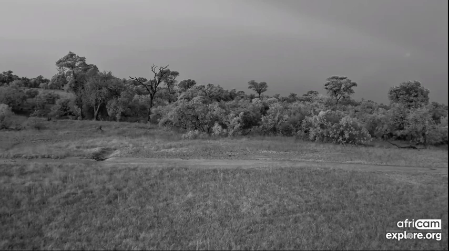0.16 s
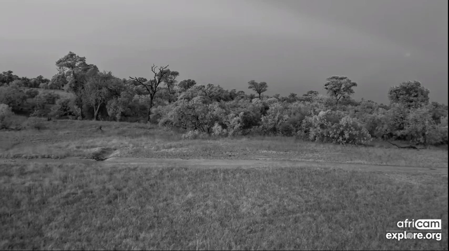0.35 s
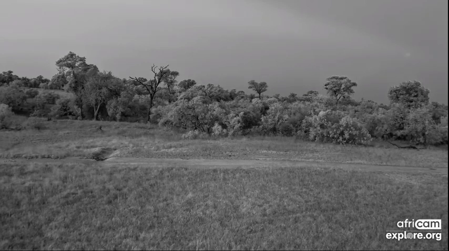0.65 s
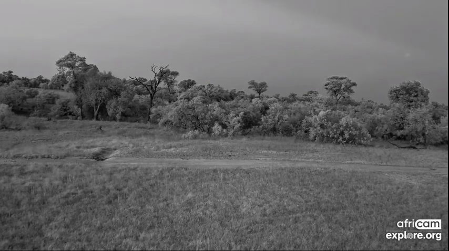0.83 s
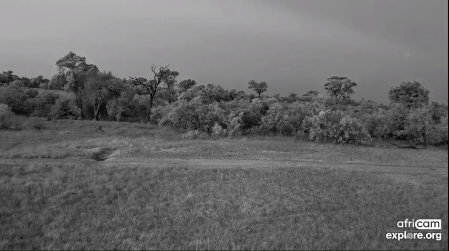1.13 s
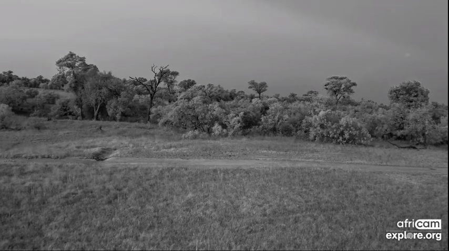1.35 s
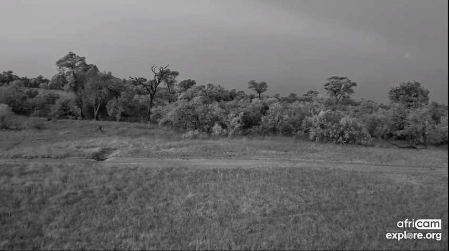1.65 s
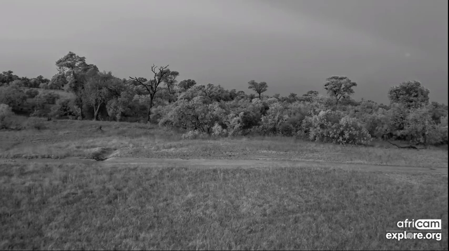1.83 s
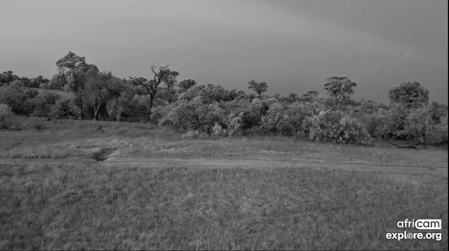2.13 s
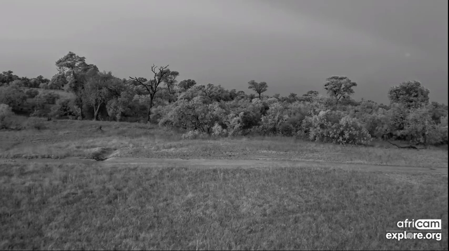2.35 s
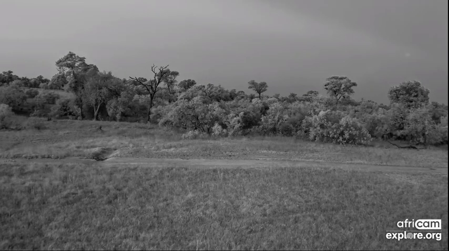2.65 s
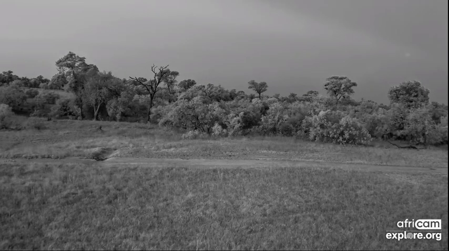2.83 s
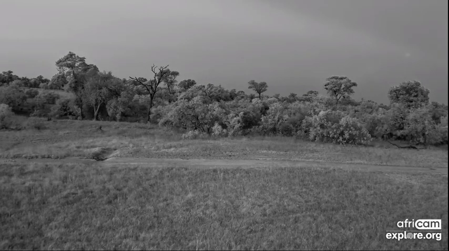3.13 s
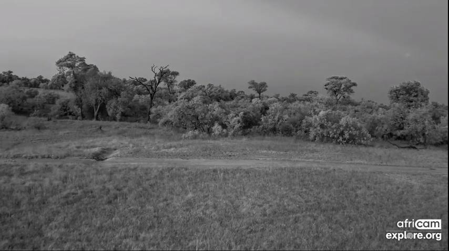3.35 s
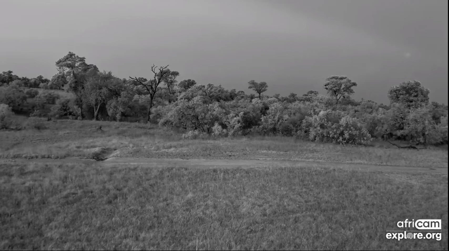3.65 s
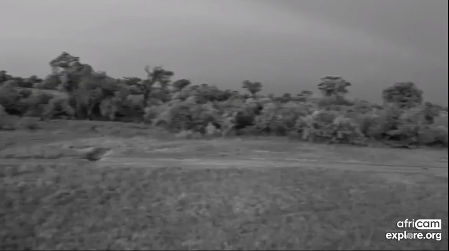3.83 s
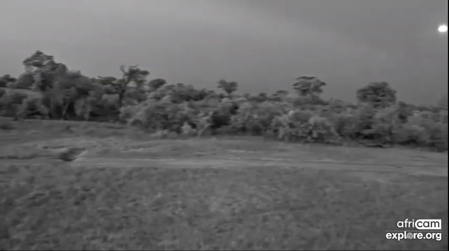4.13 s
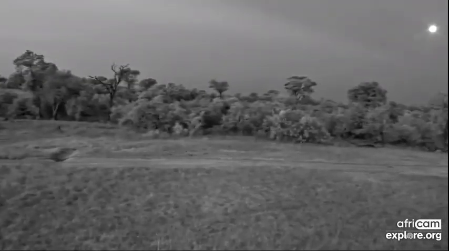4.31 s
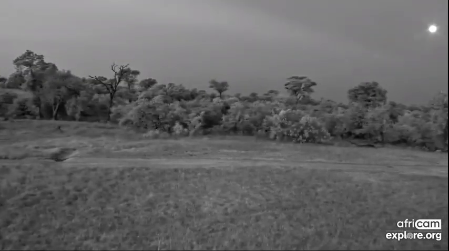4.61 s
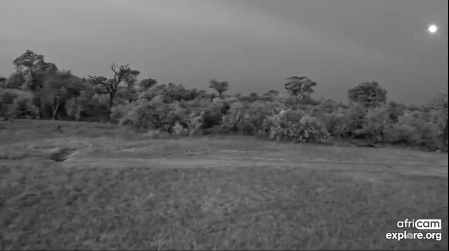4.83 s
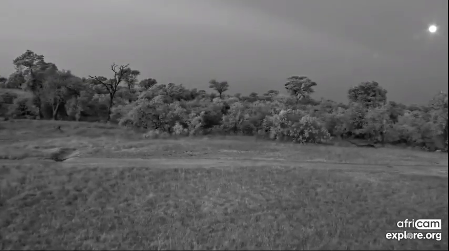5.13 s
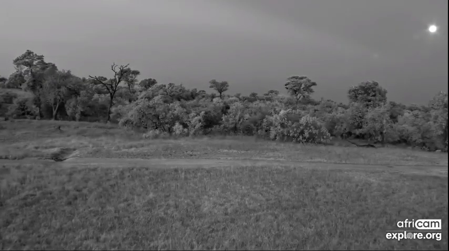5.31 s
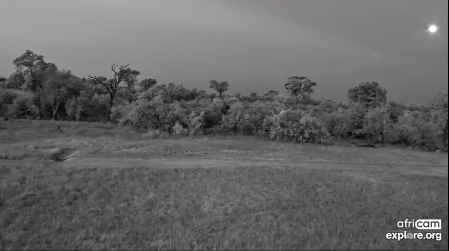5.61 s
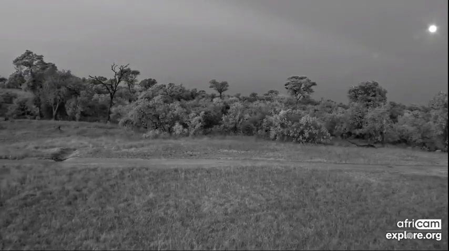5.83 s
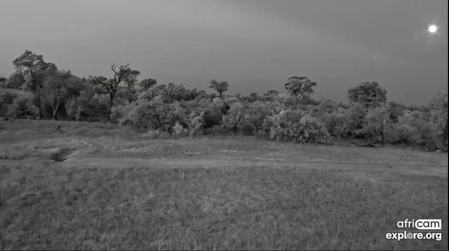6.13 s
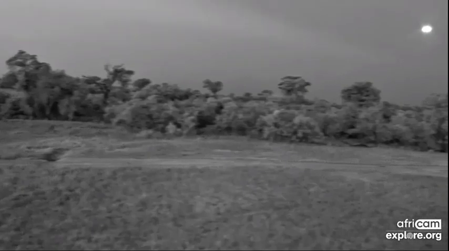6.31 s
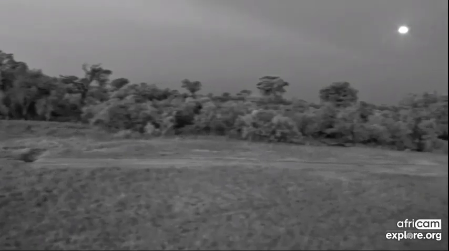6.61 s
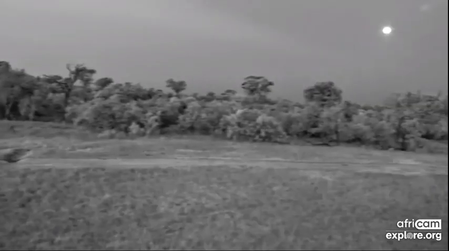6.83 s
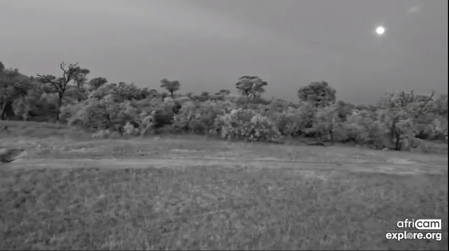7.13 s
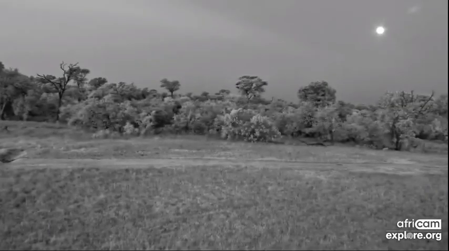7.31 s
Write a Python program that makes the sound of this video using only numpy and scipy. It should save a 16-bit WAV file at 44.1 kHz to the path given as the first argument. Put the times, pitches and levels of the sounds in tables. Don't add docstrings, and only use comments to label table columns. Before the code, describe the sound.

A faint twig snap, then five harsh guttural rasps dominate the first three seconds, close and dry with only a slight echo from trees. Brief cricket trills follow, then quieter clusters of squeaky, scratchy bird notes and quick warbles, ending in faint distant peeps. Constant high insect buzzing, airy hiss and a low wind rumble that fades fill the open night field.

```python
import sys
import numpy as np
from scipy import signal
from scipy.io import wavfile
from scipy.ndimage import uniform_filter1d, minimum_filter1d

SR = 44100
rng = np.random.default_rng(int(sys.argv[2]) if len(sys.argv) > 2 else 0)


def boost_factor(decibels):
    exponent = np.asarray(decibels, float) / 20
    return 10 ** exponent


def dump_mix(stems):
    frames = np.atleast_2d(stems).T
    limited = np.clip(frames, -1, 1)
    pcm = np.round(limited * 32767).astype(np.int16)
    wavfile.write(sys.argv[1], SR, pcm)


N = 328986

# (frequency [Hz], density [dB per Hz])
HISS_COLOUR = [(12, -32), (20, 3.5), (32, -1), (60, -2), (158, -3.5), (225, -7.5), (354, -2), (489, 2),
               (1100, -2.5), (1430, -1), (2390, -5.5), (3570, 1), (4310, -4), (6630, -5), (7380, -5),
               (12300, -10), (16000, -59), (22000, -120)]
# (time [s], level [dB])
WIND_LEVEL = [(0, -53.5), (.68, -45), (2.29, -46), (2.51, -54.5), (4.5, -61.5), (6.6, -56.5), (7.46, -67)]
# (time [s], count [strokes])
STROKE_COUNT = [(0, -.2), (1, 37.88), (2, 75.95), (3, 113.86), (4, 151.85), (4.6, 174.78), (5.4, 205.3),
                (6.4, 243.7), (7.46, 284)]
# (time [s], level [dB])
CHIRR_LEVEL = [(0, -58), (.22, -58), (.3, -55), (.81, -47), (.95, -49.5), (1.7, -45), (1.89, -40.5),
               (2.2, -44), (2.39, -51.5), (2.88, -43.5), (3.03, -47.5), (3.22, -44), (3.61, -55.5),
               (5.45, -57.5), (5.74, -52.5), (6.3, -53), (6.63, -48.5), (7.46, -54)]
# (frequency [Hz], width [Hz], level [dB])
WING_MODES = [(6830, 220, -15), (7265, 120, 0), (7590, 115, 1.5), (8105, 130, 0), (8445, 130, -2),
              (8950, 250, -10), (9300, 200, -11)]
# (time [s], tilt [dB per upper overtone], lowest overtones [dB])
FACING_TILT = [(0, -0.5, 4), (1.7, -5.5, 2.5), (2.25, 0.5, 2), (2.9, -2.5, 1), (3.3, -1, 3), (3.45, -3, 5),
               (3.75, 1, 7), (3.9, -0.5, 4.5), (5.5, -1.5, 3.5), (6.7, -1.5, -0.5), (7.46, 3.5, 4)]
# (time [s], effort [dB], upper throat [dB])
RASP_EFFORT = [
    [(0.49, -52, -47), (0.504, -39.5, -45.5), (0.594, -24.5, -33.5), (0.712, -23.5, -26.5),
     (0.742, -19.5, -23), (0.764, -23, -27), (0.828, -22.5, -27.5), (0.878, -39, -42.5), (0.91, -62, -55)],
    [(1.1, -77, -59), (1.112, -29, -41), (1.128, -23, -32.5), (1.16, -25, -32.5), (1.174, -22, -24),
     (1.182, -19, -31), (1.236, -18.5, -27), (1.31, -25, -30), (1.322, -30, -39), (1.36, -44, -53)],
    [(1.6, -65, -52), (1.612, -35, -33.5), (1.63, -15.5, -26.5), (1.636, -24, -31), (1.722, -19, -21.5),
     (1.772, -20, -27.5), (1.812, -25, -36), (1.823, -40, -38), (1.84, -61, -45)],
    [(2.05, -48, -51), (2.056, -49, -34), (2.064, -23.5, -29), (2.17, -18, -25), (2.22, -19.5, -27),
     (2.26, -33, -36), (2.27, -37, -47), (2.285, -53, -50)],
    [(2.5, -65, -69), (2.512, -25, -35), (2.542, -19.5, -28), (2.59, -24, -27.5), (2.596, -20.5, -22.5),
     (2.676, -19.5, -26.5), (2.696, -24, -30), (2.706, -27, -38), (2.74, -56, -45)],
]
# (frequency [Hz], width [Hz], level [dB])
THROAT_MODES = [(740, 220, -13.5), (1060, 160, 5.5), (1294, 123, 3), (1445, 170, -9.5), (1884, 440, -9.5),
                (2585, 570, -7.5), (3120, 280, 0), (3360, 170, 4.5), (3600, 540, -3.5), (4440, 520, 2.5),
                (5600, 1460, 2)]
TOP_OPENING = [-4, -0.5, 5.5, 2, 3.5]
# (frequency [Hz], width [Hz])
RASP_NOTCHES = [(2260, 150), (2765, 260)]
# (time [s], peak [dB])
FOLD_SLAPS = [(0.532, -27), (0.576, -19), (0.588, -27), (0.618, -23), (0.667, -16.5), (0.713, -14),
              (0.738, -12), (0.776, -14), (0.804, -13), (0.826, -12), (1.113, -20), (1.123, -17.5),
              (1.161, -19), (1.191, -13), (1.219, -19), (1.249, -20), (1.268, -8.5), (1.299, -11),
              (1.613, -16), (1.626, -15), (1.652, -8), (1.691, -9), (1.719, -11), (1.771, -10),
              (1.788, -13), (2.064, -13), (2.075, -10.5), (2.088, -18), (2.112, -14), (2.135, -19),
              (2.169, -17), (2.199, -20), (2.219, -28), (2.513, -26), (2.524, -16), (2.543, -11),
              (2.597, -12), (2.613, -16), (2.649, -17), (2.678, -25)]
# (time [s], peak [dB])
THROAT_FLARES = [(0.5412, -25), (0.5641, -18), (0.5921, -22), (0.622, -15), (0.6554, -17), (0.6905, -12.5),
                 (0.732, -12.5), (0.7594, -22), (0.7894, -30), (0.8155, -20), (1.1223, -25), (1.163, -22),
                 (1.2057, -18), (1.2271, -21), (1.2585, -25), (1.2894, -21), (1.6222, -19), (1.6424, -16),
                 (1.6675, -10), (1.7162, -7.5), (1.756, -11.5), (1.8114, -32), (2.0672, -21), (2.082, -14),
                 (2.1094, -24), (2.1294, -14), (2.1587, -14), (2.1894, -17), (2.2194, -14), (2.5117, -32),
                 (2.5252, -22), (2.5474, -31), (2.5631, -14), (2.595, -16), (2.6294, -13), (2.6678, -17),
                 (2.6888, -19)]
# (time [s], length [s], start [Hz], end [Hz], level [dB])
WHEEZE_NOTES = [(0.962, 0.045, 1480, 1550, -47.5), (1.522, 0.048, 2330, 1750, -50),
                (1.543, 0.14, 1673, 1820, -46), (2.021, 0.039, 1530, 1440, -42),
                (4.15, 0.011, 5460, 5450, -40), (4.168, 0.014, 5530, 5600, -35.5),
                (4.179, 0.018, 5500, 3130, -43), (4.217, 0.011, 5100, 5440, -45),
                (6.103, 0.039, 2000, 1660, -48), (5.168, 0.04, 5300, 5280, -52),
                (4.296, 0.046, 5480, 5430, -46), (4.454, 0.079, 5310, 5170, -46.5),
                (4.529, 0.014, 5170, 5150, -44), (4.54, 0.026, 5170, 5120, -43.5),
                (4.56, 0.024, 5080, 5180, -43), (4.57, 0.03, 5150, 3600, -47),
                (4.547, 0.05, 3250, 3320, -44), (4.629, 0.08, 5310, 5300, -45.5),
                (5.128, 0.02, 4220, 4100, -48), (5.196, 0.028, 4950, 5000, -51),
                (5.22, 0.095, 5020, 4840, -49.5), (5.296, 0.027, 4720, 3600, -48),
                (5.33, 0.026, 3800, 5000, -49), (5.342, 0.1, 4920, 5080, -47),
                (5.728, 0.037, 6300, 6080, -41.5), (5.755, 0.021, 5770, 5700, -38),
                (5.772, 0.021, 5600, 5100, -42), (5.821, 0.1, 5670, 5680, -48),
                (5.902, 0.054, 3310, 4230, -35.5), (5.955, 0.071, 4850, 4580, -42)]
# (time [s], length [s], start [Hz], end [Hz], level [dB])
WHISTLE_NOTES = [(1.186, 0.017, 4640, 4950, -31.5), (1.197, 0.05, 4876, 4940, -31.5),
                 (1.24, .008, 5050, 5370, -34), (1.247, 0.014, 5600, 6240, -29.5),
                 (1.677, 0.047, 2600, 2760, -30), (2.711, 0.024, 2780, 2790, -39),
                 (5.135, 0.026, 1745, 1650, -51.5), (5.727, 0.038, 4560, 4630, -39.5),
                 (4.273, 0.032, 2970, 2720, -33.5), (4.293, 0.046, 2740, 2654, -33.5),
                 (4.335, 0.029, 2658, 2640, -41)]
# (time [s], length [s], start [Hz], end [Hz], level [dB])
SCOLD_NOTES = [(2.727, 0.1, 3500, 3320, -43), (2.774, 0.09, 3600, 3410, -48),
               (2.732, 0.091, 4450, 4200, -54), (4.191, 0.12, 5510, 5800, -46.5),
               (4.192, 0.068, 3300, 3270, -39), (4.251, 0.12, 3600, 3440, -46),
               (5.949, 0.092, 4950, 4270, -46), (5.333, 0.113, 3400, 3460, -50.5),
               (5.735, 0.084, 5580, 4830, -44), (5.783, 0.12, 3310, 3350, -40),
               (5.791, 0.15, 5430, 5500, -47), (5.91, 0.12, 3820, 4340, -43),
               (6.028, 0.14, 4100, 3870, -43.5)]
# (time [s], length [s], start [Hz], end [Hz], level [dB])
PEEP_NOTES = [(4.157, .04, 2140, 2090, -53), (3.015, .05, 1840, 1770, -60), (6.415, .04, 2050, 2200, -54),
              (6.425, .03, 4080, 4150, -58), (6.445, .02, 3550, 3650, -55), (6.56, .02, 1800, 2200, -54),
              (6.71, .025, 4130, 4110, -54), (6.74, .014, 2100, 1600, -57), (6.845, .025, 1910, 1960, -53),
              (6.835, .02, 3400, 3500, -55), (6.885, .025, 3500, 3400, -54), (6.99, .03, 1890, 2240, -54),
              (7.015, .025, 2450, 2650, -57), (7.05, .016, 3300, 3950, -52), (7.07, .012, 3900, 3500, -56),
              (7.11, .04, 1950, 2200, -56), (7.245, .05, 1750, 2500, -56), (7.25, .012, 3350, 3650, -54),
              (7.325, .025, 3400, 3450, -54), (4.598, .03, 2300, 2200, -52), (4.604, .022, 4480, 4480, -49),
              (4.58, .022, 2950, 2900, -46), (6.259, .014, 11880, 11580, -49),
              (5.205, .016, 11700, 10500, -50)]
# (time [s], pitch [Hz], effort [dB])
SONG_PHRASES = [
    [(4.055, 2960, -54), (4.077, 2690, -45.5), (4.121, 2610, -36), (4.195, 2800, -40.5)],
    [(4.195, 2670, -37), (4.201, 2803, -24), (4.21, 2014, -36), (4.221, 1855, -48), (4.235, 2000, -38),
     (4.256, 2125, -31), (4.28, 1715, -42), (4.31, 1370, -43), (4.35, 1323, -36)],
    [(4.465, 2745, -54), (4.502, 2590, -42.5), (4.522, 2640, -45), (4.535, 2640, -56)],
    [(5.172, 2650, -55), (5.18, 2670, -41), (5.205, 2580, -54)],
    [(5.8, 1914, -40), (5.818, 1870, -39), (5.845, 1850, -43.5), (5.857, 1810, -42), (5.875, 1830, -38.5),
     (5.893, 1895, -39), (5.915, 2020, -42)],
]
# (frequency [Hz], level [dB])
BEAK_GAIN = [(1350, -18), (1850, -3), (2200, -14.5), (2750, -0.2), (3700, 3.5), (4350, -15), (5400, -13),
             (6900, -14)]
# (time [s], length [s], start [Hz], end [Hz], level [dB])
WARBLE_NOTES = [(4.196, 0.019, 3590, 3370, -36), (4.21, 0.013, 3250, 3360, -30),
                (4.215, 0.011, 3180, 2910, -33), (4.233, 0.016, 2980, 3150, -41),
                (4.253, 0.013, 4160, 2900, -44), (4.291, 0.039, 3500, 3270, -39),
                (4.338, 0.013, 3260, 3300, -43), (4.596, 0.0074, 3350, 3250, -29.5),
                (4.603, 0.016, 3280, 3230, -35), (4.589, 0.022, 3600, 3490, -39),
                (4.613, .004, 3200, 3250, -32), (4.615, 0.0087, 3250, 3500, -32),
                (4.6, 0.024, 5440, 5430, -46), (4.626, 0.016, 3380, 3360, -34.5),
                (4.645, 0.017, 3360, 3380, -29.5), (4.662, 0.0075, 3420, 3400, -30),
                (4.669, 0.0099, 3440, 3380, -32), (4.68, 0.0073, 3430, 3380, -32),
                (4.688, 0.0074, 3350, 3400, -37), (4.699, 0.0046, 3400, 3400, -40),
                (4.705, 0.011, 3320, 3520, -51), (5.134, 0.02, 3330, 3320, -50.5),
                (5.304, 0.019, 2990, 2990, -45), (5.32, 0.015, 3440, 3490, -34),
                (5.338, 0.037, 3190, 3550, -44), (5.375, 0.0092, 3750, 3230, -40),
                (5.385, 0.0062, 3300, 3600, -37), (5.39, .008, 3750, 3050, -36),
                (5.401, 0.0055, 3700, 3300, -33), (5.406, 0.017, 3370, 3300, -39.5),
                (5.425, 0.013, 3240, 3650, -41), (5.779, 0.0127, 3920, 3000, -34.5),
                (5.792, 0.014, 2920, 2510, -34), (5.785, 0.015, 3740, 3740, -38),
                (5.792, 0.011, 2200, 2160, -41.5), (5.905, 0.016, 3080, 3180, -28),
                (5.921, 0.013, 3170, 3220, -35), (6.018, 0.011, 4500, 3870, -29.5),
                (6.028, 0.01, 4030, 4430, -32), (6.038, 0.0058, 4430, 3900, -22.5),
                (6.044, 0.012, 3840, 3640, -25), (6.061, 0.01, 3990, 3370, -22),
                (6.073, .012, 3440, 3880, -24), (6.085, 0.013, 4230, 3020, -31)]
# (first sweep [s], last sweep [s], first level [dB], last level [dB])
CRICKET_TRILLS = [
    (1.84, 1.874, -54, -54),
    (1.8915, 2.0144, -45, -39),
    (2.9995, 3.084, -54, -49),
    (3.1012, 3.1535, -44, -37),
    (3.1711, 3.1886, -38, -40),
    (3.206, 3.223, -49, -49),
    (3.2406, 3.2406, -40, -40),
    (6.4138, 6.5195, -47, -41),
]
# (low [Hz], high [Hz], depth under loudest neighbour [dB])
DROPOUT_BANDS = [(480, 600, 36), (2150, 2400, 24), (2670, 2860, 15), (4700, 5250, 24), (5300, 6300, 14),
                 (6450, 6750, 17)]


def evened(x):
    return x / np.sqrt(np.mean(abs(x) ** 2) + 1e-20)


def add(mix, s, sound):
    part = mix[round(s * SR):][:len(sound)]
    part += sound[:len(part)]


def resonate(x, hz, width):
    b, a = signal.iirpeak(hz, hz / width, SR)
    return signal.lfilter(b, a, signal.lfilter(b, a, x))


def wander(length, top_hz):
    noise = rng.standard_normal(length + 4000)
    low_pass = signal.butter(4, top_hz, fs=SR, output="sos")
    return evened(signal.sosfilt(low_pass, noise)[4000:])


def curves(rows):
    s, *columns = np.transpose(rows)
    t = np.arange(s[0], s[-1], 1 / SR)
    return s[0], [np.interp(t, s, c) for c in columns]


def over_scene(rows):
    return np.interp(np.arange(N) / SR, *np.transpose(rows))


def plain_hiss():
    hz = np.fft.rfftfreq(2048, 1 / SR)
    a, b, patches = rng.standard_normal((N // 512 + 5, 1025, 3)).T
    patches = uniform_filter1d(patches, size=20, axis=0)
    patches = evened(uniform_filter1d(patches, size=8, axis=1))
    colour_hz, colour_db = np.transpose(HISS_COLOUR)
    density_db = np.interp(np.log(hz + 1), np.log(colour_hz + 1), colour_db)
    spectrum = (a + 1j * b) * boost_factor(density_db[:, None] + 0.091 * patches)
    wash = signal.istft(spectrum, nperseg=2048, noverlap=1536)[1][:N]
    return boost_factor(-48.5) * evened(wash)


def wind():
    rumble = evened(resonate(rng.standard_normal(N), 256, 1100))
    return rumble * boost_factor(over_scene(WIND_LEVEL) - 6.5)


def mains_hum():
    t = np.arange(N) / SR
    level_db = np.interp(t, [0, 4, 5.2, 7.46], [-78, -78, -68, -67])
    return np.sin(2 * np.pi * 50.4 * t) * boost_factor(level_db + 2 * wander(N, 3.7))


def katydid():
    t = np.arange(N) / SR
    stroke = (over_scene(STROKE_COUNT) + .015 * wander(N, 1.5) - .49) % 1
    teeth_hz = 430.5 - 15 * stroke
    teeth = (430.5 * stroke - 7.5 * stroke ** 2) / 38 + .004 * wander(N, 25)
    turn_s, tilt_db, low_db = np.transpose(FACING_TILT)
    facing_db, lowest_db = np.interp(t, turn_s, tilt_db), np.interp(t, turn_s, low_db)
    out = np.zeros(N)
    for k in range(16, 23):
        wing = sum(boost_factor(db) / (1 + 2j * (k * teeth_hz - hz) / width) ** 2 for hz, width, db in WING_MODES)
        overtone = (wing * np.exp(2j * np.pi * k * teeth)).real
        leaves_db = 1.5 * wander(N, 20) + 1.5 * wander(N, 2.5)
        turned_db = np.clip(k - 18, 0, 2 + (k < 22)) * facing_db + (k < 18) * lowest_db
        out += overtone * boost_factor(leaves_db + turned_db)
    swell = np.interp(stroke, [0, .06, .13, .5, .87, .94, 1], [.15, .25, .8, .9, 1, .3, .15])
    out *= swell * boost_factor(.8 * wander(N, 9))
    return evened(out) * boost_factor(over_scene(CHIRR_LEVEL) + 1.0)


def twig_snap():
    t = np.arange(900) / SR
    return boost_factor(-44 - 60 * t / 0.16) * evened(resonate(rng.standard_normal(900), 930, 1500))


def ringing(x):
    power = abs(uniform_filter1d(x ** 2, int(0.013 * SR))) + 1e-12
    return evened(x / power ** (0.22 / 2))


def surging(x, s, db, surges):
    power = uniform_filter1d(x ** 2, int(0.012 * SR)) + 1e-9
    steady = evened(x / power ** (0.19 / 2))
    inside = [(at, peak) for at, peak in surges if s < at < s + len(x) / SR] or [(0, -99)]
    slap_s, peak_db = np.transpose(inside)
    since = (s + np.arange(len(x)) / SR)[:, None] - slap_s
    after = np.maximum(since, 0)
    rise_s, fall_s, catch_s = 0.0005, 0.0089, 0.0053
    burst = boost_factor(peak_db - 8) * (1 - np.exp(-after / rise_s)) * np.exp(-after / fall_s)
    catch = 1 - 0.17 * np.exp(-((since + catch_s / 2) / catch_s) ** 2).max(1)
    return steady * np.hypot(boost_factor(db - 0.5) * catch, burst.max(1))


def rasp(rows, top_db):
    s, (effort_db, upper_db) = curves(rows)
    length = len(effort_db)
    slaps = rng.choice([-1, 0, 1], length, p=[.01, .98, .01])
    breath = rng.standard_normal(length) * boost_factor(wander(length, 130))
    drive = breath + 0.28 * evened(slaps)
    bands = [(-1) ** k * boost_factor(db) * ringing(resonate(drive, hz, width))
             for k, (hz, width, db) in enumerate(THROAT_MODES)]
    low, high = sum(bands[:5]), sum(bands[5:9])
    top = evened(bands[9] + bands[10] * boost_factor(top_db + 1.5 * wander(length, 31)))
    voice = surging(low, s, effort_db, FOLD_SLAPS)
    voice += surging(high, s, upper_db, THROAT_FLARES)
    voice += boost_factor((effort_db + upper_db) / 2 - 16) * top
    for hz, width in RASP_NOTCHES:
        voice = signal.lfilter(*signal.iirnotch(hz, hz / width, SR), voice)
    return s, voice * signal.windows.tukey(length, .03)


def membrane(hz, wobble, throb_db, hoarse):
    length = len(hz)
    phase = 2 * np.pi * np.cumsum(hz * (1 + wobble * wander(length, 207))) / SR
    throb = boost_factor(throb_db * np.minimum(wander(length, 143), 1))
    gain = evened(throb * (1 + hoarse * wander(length, 740)))
    return phase, np.sqrt(2) * gain * signal.windows.tukey(length, min(1, 200 / length))


def syllable(length_s, hz_start, hz_end, db, **voice):
    phase, gain = membrane(np.linspace(hz_start, hz_end, int(length_s * SR)), **voice)
    return boost_factor(db) * gain * np.sin(phase)


def flutter(length, depth):
    beat = np.cumsum(58 * (1 + .15 * wander(length, 40))) / SR % 1
    return evened(1 - depth * np.exp(-((beat - .5) / .16) ** 2))


def fading(length):
    u = np.linspace(0, 1, length)
    return np.minimum(u / .12, 1) * np.minimum((1 - u) / .45, 1) * boost_factor(1 + 2.5 * wander(length, 45))


def bird_notes(out):
    for s, *shape in WHEEZE_NOTES:
        note = syllable(*shape, wobble=.011, throb_db=3, hoarse=.4)
        add(out, s, note * flutter(len(note), depth=.5) * signal.windows.tukey(len(note), .4))
    for s, *shape in WHISTLE_NOTES:
        note = syllable(*shape, wobble=.005, throb_db=2, hoarse=.2)
        add(out, s, note * signal.windows.tukey(len(note), .3))
    for s, *shape in SCOLD_NOTES:
        note = syllable(*shape, wobble=.045, throb_db=2, hoarse=2.5)
        add(out, s, note * fading(len(note)))
    for s, *shape in PEEP_NOTES:
        add(out, s, syllable(*shape, wobble=.012, throb_db=3.5, hoarse=.35) * boost_factor(-1))
    for s, *shape in WARBLE_NOTES:
        add(out, s, syllable(*shape, wobble=.018, throb_db=1.6, hoarse=.2))


def bird_song(out):
    for rows in SONG_PHRASES:
        s, (hz, db) = curves(rows)
        phase, gain = membrane(hz, wobble=.011, throb_db=3, hoarse=.45)
        if hz.min() > 1700:
            gain = gain * flutter(len(hz), depth=.75 if hz.min() > 2200 else .65)
        for k, start_db in [(1, 0), (2, 0), (3, -4.5)]:
            beak_db = np.interp(k * hz, *np.transpose(BEAK_GAIN), right=-99)
            add(out, s, gain * boost_factor(db + start_db + beak_db) * np.sin(k * phase))


def cricket(out):
    t = np.arange(480) / SR
    for first, last, db_first, db_last in CRICKET_TRILLS:
        sweeps = round((last - first) * 57) + 1
        for s, db in zip(np.linspace(first, last, sweeps), np.linspace(db_first, db_last, sweeps)):
            top_hz = 5500 * rng.uniform(.99, 1.01)
            sweep = np.sin(2 * np.pi * (top_hz * t - 58000 * t ** 2))
            sweep *= signal.windows.tukey(480, .7) * boost_factor(2 * wander(480, 300))
            add(out, s - .0054, boost_factor(db - 1) * sweep)


def tree_echo(x):
    t = np.arange(9000) / SR
    trees = rng.standard_normal(9000) * boost_factor(-60 * t / 0.29) * (t > .008)
    return signal.oaconvolve(x, trees / np.linalg.norm(trees))[:N]


def scene():
    floor = plain_hiss() + wind() + mains_hum()
    chirr = katydid()
    callers = np.zeros(N)
    add(callers, .283, twig_snap())
    for rows, top_db in zip(RASP_EFFORT, TOP_OPENING):
        add(callers, *rasp(rows, top_db))
    bird_notes(callers)
    bird_song(callers)
    cricket(callers)
    mono = callers + boost_factor(-1) * chirr + floor
    mono += boost_factor(-25.5) * tree_echo(callers + boost_factor(17) * chirr)
    return np.array([mono, mono])


def dropouts(x):
    hz, t, z = signal.stft(x, SR, nperseg=1024, noverlap=768)
    bands, centre = z[:512].reshape(128, 4, -1), hz[2:512:4, None]
    power = uniform_filter1d((abs(bands) ** 2).mean(1), size=4, axis=1)
    power_db = 10 * np.log10(power + 1e-14)
    under_db = -minimum_filter1d(-power_db, size=35, axis=0) - power_db
    margin_db = np.full(centre.shape, 99.)
    for low_hz, high_hz, db in DROPOUT_BANDS:
        margin_db[(centre > low_hz) & (centre < high_hz)] = db
    luck = uniform_filter1d(rng.standard_normal(power_db.shape), size=10, axis=1)
    luck = evened(uniform_filter1d(luck, size=2, axis=0))
    empty = np.minimum(under_db - margin_db, 7) / 5 + luck - 1.45
    treble = centre[:, 0] > 9000
    speckle = evened(uniform_filter1d(rng.standard_normal(power_db.shape), size=8, axis=1))
    empty[treble] = speckle[treble] - 1.5
    loud_db = power_db.max(0) - np.median(power_db.max(0))
    empty += (centre > 9000) * np.clip(loud_db, 0, 28) / 20
    z[:512] *= np.repeat(np.clip(1 - 4 * empty, .03, 1), 4, axis=0)
    z[hz > 12330] = 0
    z[hz > 12000] *= .25 * (luck[60] > .9)
    filled = np.zeros(z.shape)
    for s, low_hz, wide_hz in rng.uniform([0, 4200, 1000], [7.4, 10200, 2500], size=(27, 3)):
        filled[np.ix_((hz > low_hz) & (hz < low_hz + wide_hz), abs(t - s) < .012)] = 1
    other = np.roll(z, 40, axis=1)
    alike = (abs(z) < 3 * abs(other)) & (abs(z) * 3 > abs(other))
    side = .6 * filled * other * alike
    return signal.istft(np.array([z + side, z - side]), nperseg=1024, noverlap=768)[1][:, :N]


def roll_off(x):
    return signal.sosfilt(signal.butter(12, 12610, fs=SR, output="sos"), x)


def record(dry):
    preamp = 0.58 * np.tanh(dry.mean(0) / 0.61)
    mix = dropouts(preamp)
    return roll_off(mix)


dry = scene()
out = record(dry)
dump_mix(out)
```